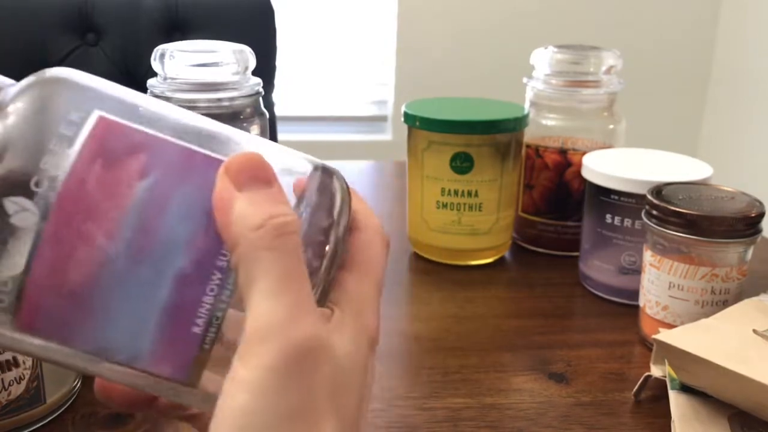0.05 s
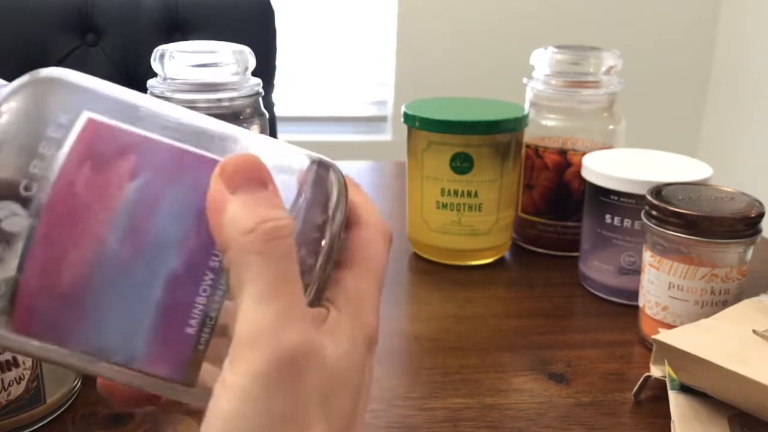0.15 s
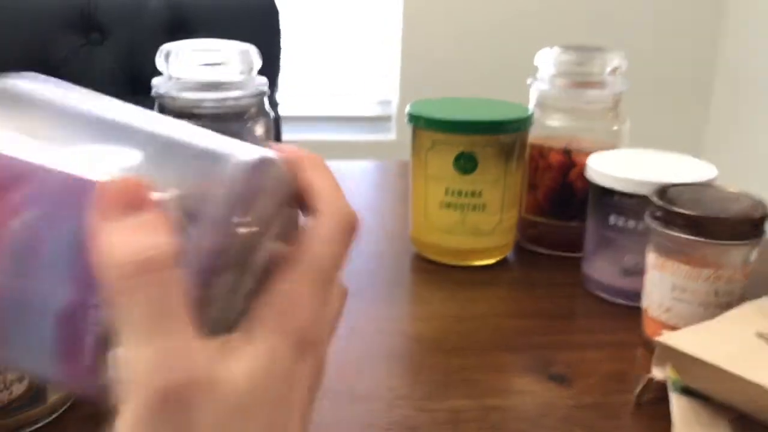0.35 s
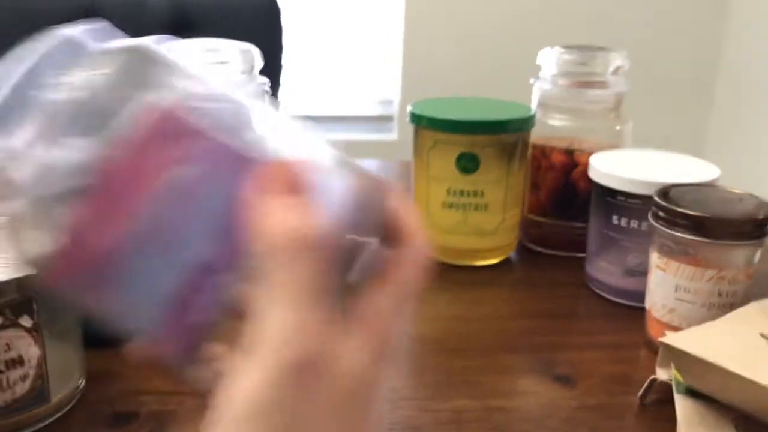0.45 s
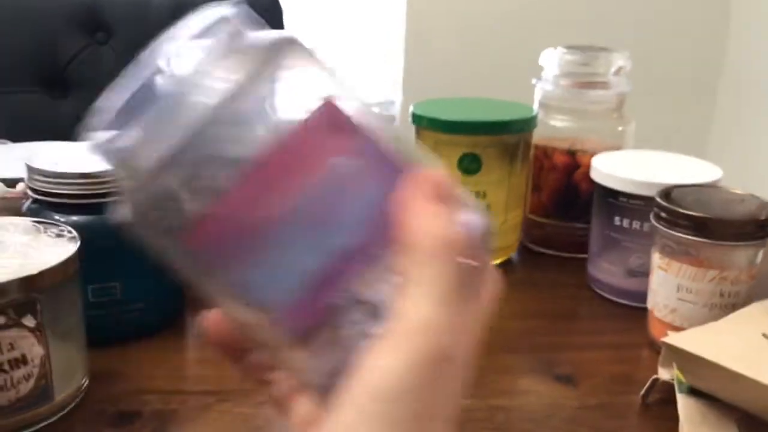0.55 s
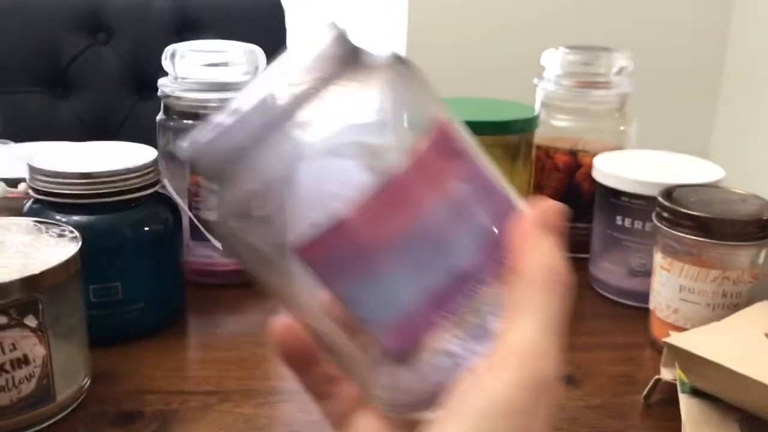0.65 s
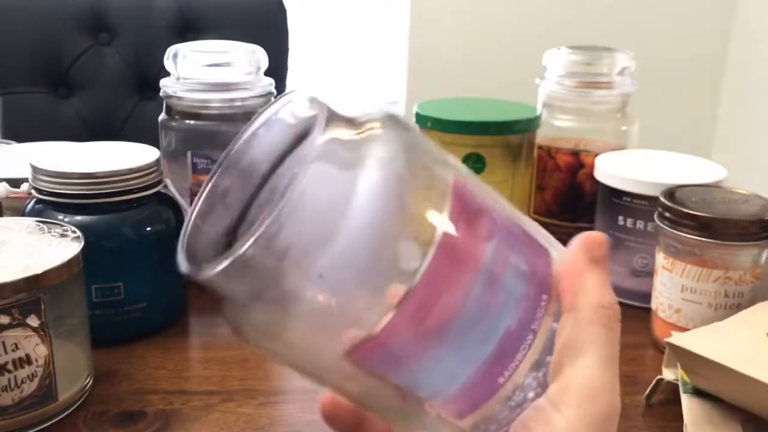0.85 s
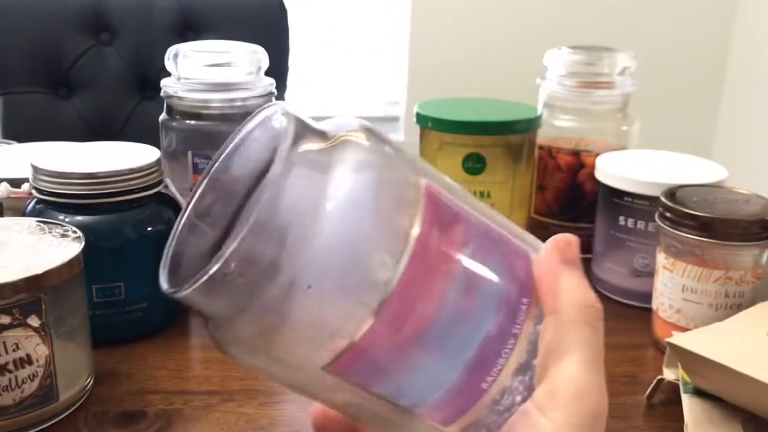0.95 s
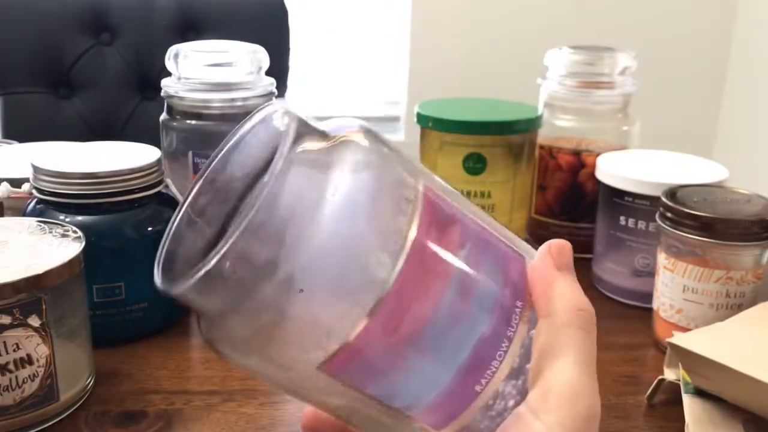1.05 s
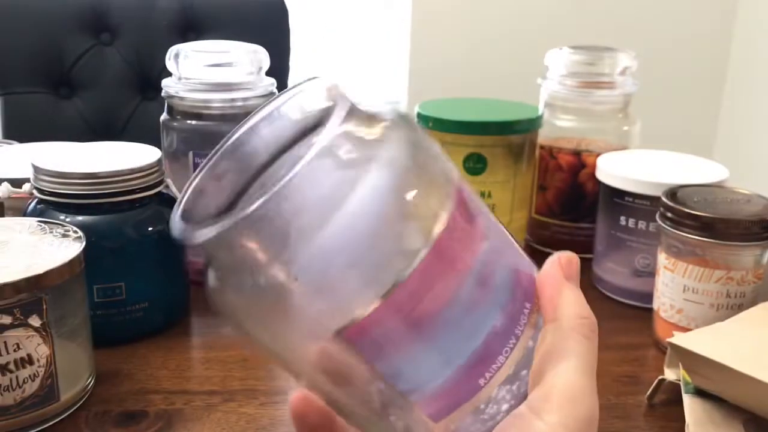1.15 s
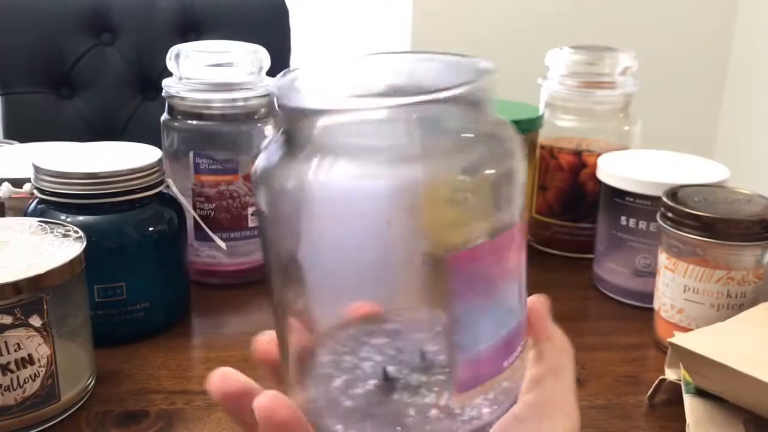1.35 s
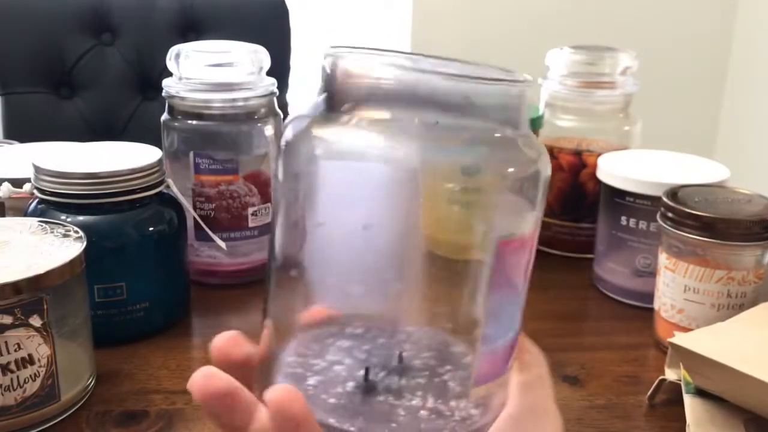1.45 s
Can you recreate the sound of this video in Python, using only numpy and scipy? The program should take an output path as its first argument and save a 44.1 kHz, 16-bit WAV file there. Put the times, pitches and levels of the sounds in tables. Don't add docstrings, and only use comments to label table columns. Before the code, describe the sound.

A glass jar lid comes off, heard close in a quiet, slightly reverberant room. Around 0.24 s a very short airy hiss leads into a hollow rising pop and low thump, then a tight burst of hard, bright glass clinks at 0.3 s. A weaker clinking bounce follows at 0.4 s; thin ringing fades by about 0.8 s. Faint rumble and hum remain, with a dull fingertip tap near 1.1 s.

```python
import sys
import numpy as np
from scipy import signal
from scipy.fft import rfft, irfft
from scipy.io import wavfile
from scipy.ndimage import uniform_filter1d

SR = 44100
rng = np.random.default_rng(int(sys.argv[2]) if len(sys.argv) > 2 else 0)


def decibels_to_gain(level_db):
    exponent = np.asarray(level_db, float) / 20
    return 10 ** exponent


def generate_wav(sig):
    pcm = np.round(np.clip(np.atleast_2d(sig).T, -1, 1) * 32767).astype(np.int16)
    wavfile.write(sys.argv[1], SR, pcm)


N = 66150
T = np.arange(N) / SR

# (frequency [Hz], level [dB])
RUMBLE_SPECTRUM = [(12, -63.5), (20, -36.5), (36, -7.5), (59, -1.5), (81, -8.5), (161, -2.5), (184, -9.5),
                   (287, -8.5), (700, -32), (910, -62.5), (1540, -120)]
# (frequency [Hz], level [dB])
AIR_SPECTRUM = [(500, -5), (1030, -4), (1830, -11), (6420, -17), (10300, -21), (12600, -20), (14200, -18),
                (15700, -19)]
RUMBLE_DB, AIR_DB = -57, -70.5
# (frequency [Hz], width [Hz], level [dB])
HUM_LINES = [(56, 8, -61.5), (160, 3.4, -62), (225.6, 10, -66.5), (286, 30, -68.5)]
# (frequency [Hz], width [Hz], rate [1/s], unevenness [log], length [s], level [dB])
TICK_TRAINS = [(15480, 400, 33, .25, .008, -75), (12700, 550, 62, .6, .005, -78)]

RUSTLE_HZ, RUSTLE_WIDTH_HZ, RUSTLE_DB, RUSTLE_PATCH_DB = 1120, 450, -83.5, 4.0

# (frequency [Hz], t60 [s])
ROOM_DECAY = [(100, 0.66), (500, 0.58), (1500, 0.58), (4000, .4), (9000, 0.19), (16000, .2)]
ROOM_DB, ROOM_START_S = -17, 0.0044

# (frequency [Hz], level [dB])
HISS_SPECTRUM = [(400, -39.5), (900, -14), (1350, -6), (2340, -3.5), (3430, -12), (8700, -7.5),
                 (12000, -10), (16000, -13)]
HISS_S, HISS_RISE_S, HISS_T60_S, HISS_DB, HISS_GRAIN_DB = .2452, .03, .065, -40, 2.2
WHISTLE_HZ, WHISTLE_WIDTH_HZ, WHISTLE_DB, WHISTLE_T60_S = 5970, 220, -54, .09

POP_S, OPEN_HZ, OPENING_S, POP_RISE_S, POP_T60_S, POP_DB = .2437, 431, .0085, 0.012, 0.1, -14.5
THUMP_S, THUMP_HZ, THUMP_T60_S, THUMP_DB = .2490, 126, .045, -13.5

# (time [s], strength [dB], brightness [dB])
CONTACTS = [
    (0.295, -34.5, -4),
    (0.2965, -1, 0),
    (0.2998, 4, 3),
    (0.3026, 1.5, 2.5),
    (0.3051, -9.5, -2),
    (0.3071, -3, -3),
    (.3105, -7.5, -6.5),
]
# (time [s], strength [dB], brightness [dB])
BOUNCE = [
    (.371, -40, -6),
    (.3930, -12, 1.5),
    (.3965, -20.5, -2),
    (.3995, -17.5, 0),
    (.4028, -18.5, -7),
    (.4075, -23.5, -6),
    (.4535, -36.5, 4),
]
# (frequency [Hz], level [dB], t60 [s], change in the bounce [dB])
HELD_MODES = [(429, -6, 0.07, 5), (698.4, -15, 0.044, 14.5), (1281, -19, 0.025, -0.5),
              (1343.5, -15, 0.1, -1.5), (1642, 1, 0.056, -8), (2044, -12, 0.029, -1), (2345, -16, .04, -26),
              (2730, -19, .04, 1.5), (3803, -14.5, 0.054, -0.5), (4393, -25.5, .06, 8.5),
              (5840, -19, 0.066, 9), (9150, -8.5, 0.035, -7.5), (9433, -11, .04, -4),
              (11390, -22.5, 0.091, -3),
              (11880, -22, .045, -4), (13100, -27, .04, -3), (14230, -30, .025, -6), (14940, -23, .05, -8)]
# (frequency [Hz], level [dB])
CRACK_SPECTRUM = [(120, -41.5), (200, -12.5), (1660, -6.5), (3440, -18.5), (5890, -25), (7930, -32),
                  (9200, -14.5), (15500, -23.5), (17000, -56.5)]
GLASS_DB, CRACK_DB, CRACK_T60_S, BRIGHT_HZ = -17.5, -24, .02, 5270
GRIP_DETUNE = .006

# (frequency [Hz], level [dB], t60 [s], start [s])
FREE_MODES = [(436, -45, .45, .41), (1638, -29, .26, .3203), (1642.5, -37, .44, .4), (1631.2, -49, .85, .4),
              (1671, -51, .4, .4), (1617, -54, .6, .4), (2155, -33, .42, .316), (2165, -47, .75, .316),
              (4372, -42, .12, .32), (4360, -55, .3, .33), (4380, -50, .14, .4), (5980, -54, .2, .31)]

JOLT_S, JOLT_HZ, JOLT_T60_S, JOLT_DB = .378, 55, .1, -46

# (time [s], level [dB])
FINGER_TAPS = [
    (.967, -79),
    (1.1105, -56.5),
    (1.285, -77),
]
# (frequency [Hz], level [dB])
FINGER_SPECTRUM = [(300, -17), (900, 8.5), (3200, -6), (5000, -24), (16000, -19)]

MIC_LOW_HZ, EDGE_HZ = 40, 15740


def evened(x):
    return x / np.sqrt(np.mean(x ** 2) + 1e-20)


def read(points, hz):
    f, value = np.transpose(points)
    return np.interp(np.log(hz + 1), np.log(f + 1), value)


def noise(points):
    gain = decibels_to_gain(read(points, np.fft.rfftfreq(N, 1 / SR)))
    return evened(irfft(rfft(rng.standard_normal(N)) * gain, N))


def band_noise(hz, width_hz):
    bell = np.exp(-((np.fft.rfftfreq(N, 1 / SR) - hz) / width_hz) ** 2)
    return evened(irfft(rfft(rng.standard_normal(N)) * bell, N))


def swell(start_s, rise_s, t60_s):
    u = np.maximum(T - start_s, 0)
    rise = np.sin(np.pi / 2 * np.minimum(u / rise_s, 1)) ** 2
    return rise * decibels_to_gain(-60 * np.maximum(u - rise_s, 0) / t60_s)


def high_pass(x, hz):
    return signal.sosfilt(signal.butter(2, hz, "high", fs=SR, output="sos"), x)


def room_tone():
    rumble = decibels_to_gain(RUMBLE_DB) * noise(RUMBLE_SPECTRUM + [(900, -57.5)])
    out = rumble + decibels_to_gain(AIR_DB) * noise([(300, -51)] + AIR_SPECTRUM)
    for hz, width_hz, db in HUM_LINES:
        out += decibels_to_gain(db) * band_noise(hz, width_hz)
    return out


def electronic_ticks():
    out = np.zeros(N)
    coarse_s = T[::32]
    for hz, width_hz, rate_hz, uneven, length_s, db in TICK_TRAINS:
        luck = rng.standard_normal((200, 2))
        at_s = np.cumsum(np.exp(uneven * luck[:, 0])) / rate_hz
        bursts = np.exp(-(2 * (coarse_s - at_s[:, None]) / length_s) ** 2)
        gate = (decibels_to_gain(1.6 * luck[:, 1:]) * bursts).sum(0)
        out += decibels_to_gain(db) * np.interp(T, coarse_s, gate) * band_noise(hz, width_hz)
    return out


def skin_slide():
    patches = uniform_filter1d(uniform_filter1d(rng.standard_normal(N), size=900), size=900)
    return decibels_to_gain(RUSTLE_DB + RUSTLE_PATCH_DB * evened(patches)) * band_noise(RUSTLE_HZ, RUSTLE_WIDTH_HZ)


def room(x):
    taps = np.zeros(SR)
    at = np.arange(round(ROOM_START_S * SR), SR - 20, 20)
    at_jittered = at + rng.integers(0, 20, len(at))
    taps[at_jittered] = rng.choice([-1., 1.], len(at))
    hz, t, z = signal.stft(taps, SR, nperseg=256)
    decay = decibels_to_gain(-60 * t / read(ROOM_DECAY, hz)[:, None])
    tail = signal.istft(z * decay, SR, nperseg=256)[1]
    return signal.fftconvolve(x, tail / np.linalg.norm(tail))[:N]


def seal_hiss():
    grain_db = HISS_GRAIN_DB * evened(uniform_filter1d(rng.standard_normal(N), size=60))
    slope_s = np.where(T < HISS_S, HISS_RISE_S, HISS_T60_S)
    leak_db = HISS_DB - 60 * abs(T - HISS_S) / slope_s
    whistle = swell(HISS_S - .004, .01, WHISTLE_T60_S) * band_noise(WHISTLE_HZ, WHISTLE_WIDTH_HZ)
    return decibels_to_gain(leak_db + grain_db) * noise(HISS_SPECTRUM) + decibels_to_gain(WHISTLE_DB) * whistle


def air_pop():
    u = T - POP_S
    turns = OPEN_HZ * (u - OPENING_S * (1 - np.exp(-np.maximum(u, -.01) / OPENING_S)))
    return decibels_to_gain(POP_DB) * swell(POP_S - .006, POP_RISE_S + 0.0068, POP_T60_S) * np.cos(2 * np.pi * turns)


def thump():
    tone = np.sin(2 * np.pi * THUMP_HZ * (T - THUMP_S))
    return decibels_to_gain(THUMP_DB) * swell(THUMP_S - .001, .003, THUMP_T60_S) * tone


def chatter(contacts, dull):
    hz, db, t60_s, change_db = np.transpose(HELD_MODES)[:, :, None]
    spots = rng.standard_normal((len(contacts), len(hz), 2))
    crack, out = noise(CRACK_SPECTRUM), np.zeros(N)
    for (s, hit_db, bright_db), luck in zip(contacts, spots):
        span = slice(round(s * SR), round((s + .2) * SR))
        u = T[span] - s
        tilt_db = bright_db * np.log2(hz / BRIGHT_HZ).clip(-1, 1)
        gain = decibels_to_gain(db + dull * change_db + tilt_db + 3.1 * luck[:, :1] - 60 * u / t60_s)
        shifted_hz = hz * (1 + GRIP_DETUNE * luck[:, 1:] * hz / 10000)
        phase = 0.89 * luck[:, 1:] * np.minimum(u / 0.00078, 1)
        ring = (gain * np.sin(2 * np.pi * shifted_hz * u + phase)).sum(0)
        out[span] += decibels_to_gain(GLASS_DB + hit_db) * ring
        out += decibels_to_gain(CRACK_DB + hit_db) * swell(s, 0.00016, CRACK_T60_S) * crack
    return high_pass(out, 250)


def ring_on():
    out = np.zeros(N)
    for hz, db, t60_s, s in FREE_MODES:
        out += decibels_to_gain(db) * swell(s - .008, 0.0071, t60_s) * np.sin(2 * np.pi * hz * (T - s))
    return out


def table_jolt():
    return decibels_to_gain(JOLT_DB) * swell(JOLT_S, 0.0069, JOLT_T60_S) * np.sin(2 * np.pi * JOLT_HZ * (T - JOLT_S))


def finger_taps():
    gate = sum(decibels_to_gain(db) * swell(s, 0.0008, 0.023) for s, db in FINGER_TAPS)
    return noise(FINGER_SPECTRUM) * gate


def scene():
    near = skin_slide() + seal_hiss() + air_pop() + thump()
    near += chatter(CONTACTS, dull=0) + chatter(BOUNCE, dull=1)
    near += table_jolt() + finger_taps()
    near = high_pass(near, MIC_LOW_HZ)
    background = room_tone() + electronic_ticks()
    return (near + decibels_to_gain(ROOM_DB) * room(near) + ring_on() + background)[None]


def roll_off(x):
    return signal.sosfilt(signal.butter(12, 17140, fs=SR, output="sos"), x)


def record(dry):
    low_pass = signal.firwin(1023, EDGE_HZ, window=("kaiser", 9), fs=SR)
    kept = signal.oaconvolve(dry, low_pass[None], "same")
    trace = decibels_to_gain(-20) * swell(.294, .002, .03) * (dry - kept)
    return roll_off(kept + trace)


dry = scene()
out = record(dry)
generate_wav(out)
```